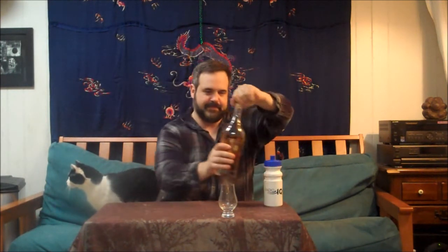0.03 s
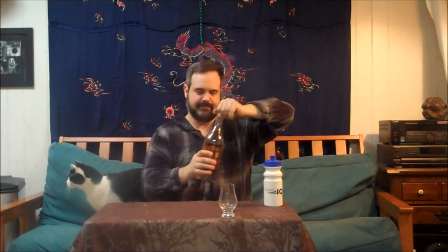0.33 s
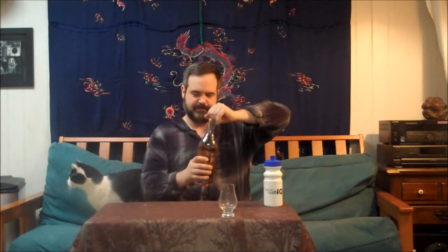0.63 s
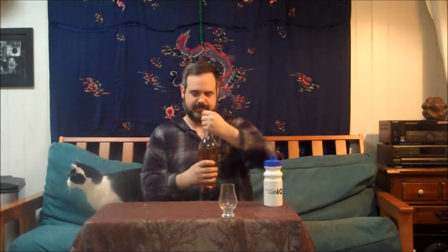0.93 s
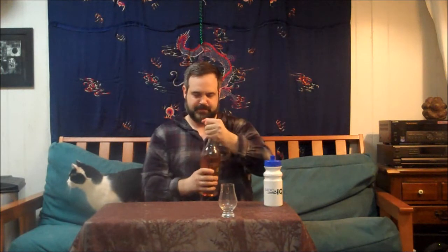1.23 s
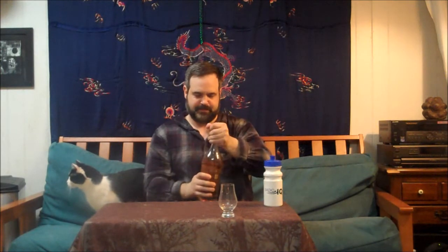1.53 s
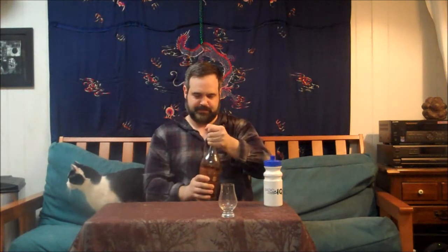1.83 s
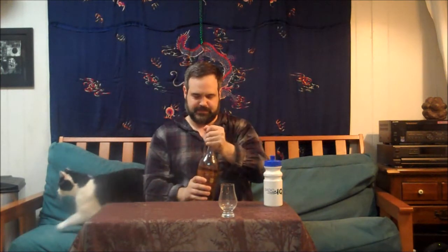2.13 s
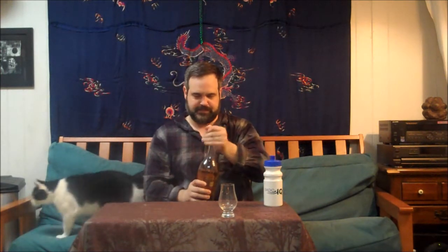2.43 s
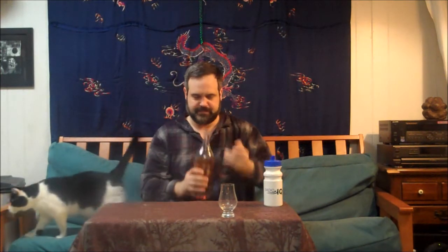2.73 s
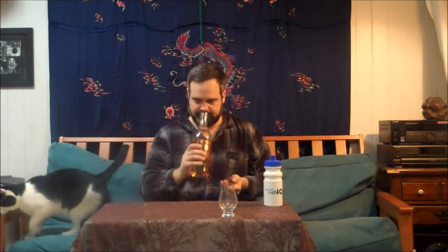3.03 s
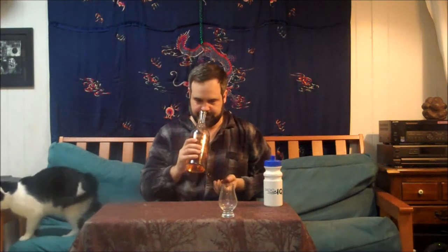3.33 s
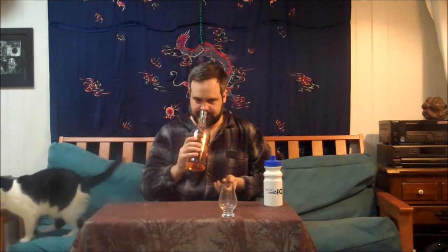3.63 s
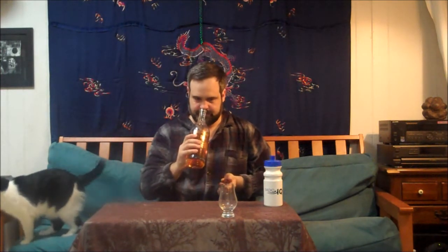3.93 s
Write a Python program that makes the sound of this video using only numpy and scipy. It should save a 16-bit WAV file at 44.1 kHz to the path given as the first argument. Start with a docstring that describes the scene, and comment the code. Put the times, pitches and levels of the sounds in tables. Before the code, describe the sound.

A cork rasps and squeaks as it is twisted out of a glass bottle.

```python
"""Uncorking a bottle

A cork is twisted out of a glass bottle in a quiet living room, a couple of metres away.
It sticks and slips in the neck: one long rasp, a shorter creak, a rising squeak that breaks up,
and a last chirp as it comes free. Every slip makes the cork and neck ring.
Underneath lie room air, the brush of a sleeve and the faint hum of an appliance."""
import sys
import numpy as np
from scipy import signal
from scipy.fft import rfft, irfft
from scipy.io import wavfile
from scipy.ndimage import uniform_filter1d

SR = 44100
rng = np.random.default_rng(int(sys.argv[2]) if len(sys.argv) > 2 else 0)


def wrap_up_sound(samples):
    """Save the sound to the file named by the first command line argument, as 16-bit audio."""
    columns = np.atleast_2d(samples).T
    # keep every value between -1 and 1, then stretch to whole-number steps
    tamed = np.clip(columns, -1, 1)
    steps = np.round(tamed * 32767).astype(np.int16)
    wavfile.write(sys.argv[1], SR, steps)


N = 176400
TIME = np.arange(N) / SR

# How the first twist moves: t/s, level/dB, slip rate/Hz
RASP_SLIPS = [(1.066, -37.5, 216), (1.11, -31.5, 158), (1.144, -41, 144), (1.155, -46.5, 134),
              (1.178, -34.5, 123.4), (1.2, -29, 137), (1.225, -28.5, 160.5), (1.26, -29.5, 154.6),
              (1.32, -26.5, 152), (1.352, -27, 220), (1.374, -36, 139), (1.40, -27, 129),
              (1.43, -31.5, 108), (1.46, -26, 261), (1.50, -32.5, 210), (1.515, -44, 160)]
# How the cork's grip colours the sound: f/Hz, gain/dB
RASP_GRIP = [(400, 2), (800, 3), (1200, -3.5), (2000, -2), (3400, 0), (4300, 0.5), (5600, 1.5),
             (8500, -0.5), (13000, -5)]
def rasp():
    """The first, long twist: the cork catches and lets go over and over."""
    return stick_slip(RASP_SLIPS, RASP_GRIP)


# How the second twist moves: t/s, level/dB, slip rate/Hz
CREAK_SLIPS = [(1.807, -35, 181.6), (1.82, -31, 183.8), (1.845, -24.5, 228.9), (1.865, -23, 258.1),
               (1.893, -25.5, 259.8), (1.912, -32, 221.6), (1.925, -60, 180)]
# The colour of its grip: f/Hz, gain/dB
CREAK_GRIP = [(400, -13), (850, 0.5), (1200, -8), (2050, 1), (2700, -1), (3400, 3), (4600, 1), (6500, 3),
              (8300, -8.5), (13000, -9.5)]
def creak():
    """A shorter twist: the slips speed up, then slow down."""
    return stick_slip(CREAK_SLIPS, CREAK_GRIP)


# Sudden jerks of the cork: t/s, strength/dB
JERK_HITS = [(1.066, -35), (1.1105, -11), (1.134, -4.5), (1.167, -9), (1.3835, -14), (1.393, -15),
             (1.5399, -7.5), (1.5452, -5.5), (1.55, -20), (1.5551, -7.5), (1.8075, -26), (1.866, -21),
             (1.8775, -9), (1.892, -8), (2.043, -12), (2.046, -30)]
def jerks():
    """Single hard slips, each ringing the neck like a click."""
    return ring_neck(slip_force([(t, amp(db)) for t, db in JERK_HITS]), RASP_GRIP)


# The clean, rising tone: t/s, f/Hz, level/dB
SQUEAK_TONE = [(1.992, 1394, -43), (1.999, 1486, -35), (2.006, 1692, -32.5), (2.014, 1758, -29.5),
               (2.022, 1830, -57)]
# The slips it breaks into: t/s, level/dB, slip rate/Hz
SQUEAK_SLIPS = [(2.014, -27.5, 324.8), (2.026, -28.5, 202.2), (2.046, -24.5, 198.8), (2.056, -38.5, 195),
                (2.078, -45, 182.5)]
# The colour of the grip during those slips: f/Hz, gain/dB
SQUEAK_GRIP = [(400, -9), (1100, -21.5), (1750, -7), (2200, -0.5), (3300, 0), (4400, 13), (6000, -3.5),
               (8500, -0.5), (13000, -7.5)]
def squeak():
    """The third twist: the slips lock to a pitch, then break up."""
    return slip_tone(SQUEAK_TONE, RASP_GRIP) + stick_slip(SQUEAK_SLIPS, SQUEAK_GRIP)


# The clean tone in the chirp: t/s, f/Hz, level/dB
RELEASE_TONE = [(2.1575, 1760, -33), (2.169, 1808, -38), (2.175, 1790, -50), (2.178, 2433, -23.5),
                (2.190, 2356, -31.5), (2.198, 2360, -48)]
# The quick slips under it: t/s, level/dB, slip rate/Hz
RELEASE_SLIPS = [(2.1575, -26, 802), (2.168, -21, 717.5), (2.174, -22, 507), (2.186, -41, 445),
                 (2.195, -44, 425)]
# The colour of the grip for both: f/Hz, gain/dB
RELEASE_GRIP = [(400, -16), (1200, -15), (2250, -2.5), (2650, -13), (3400, -2.5), (4200, -1.5), (5300, 10),
                (6800, -15.5), (8600, 3), (13000, -15)]
def chirp():
    """The last twist: the tone jumps up as the cork comes free."""
    return slip_tone(RELEASE_TONE, RELEASE_GRIP) + stick_slip(RELEASE_SLIPS, RELEASE_GRIP)


def stick_slip(curve, grip, gap_scatter=0.14, scatter_db=1, max_slips=300):
    """The cork sticks, then slips, in an uneven run that follows the curve's level and rate."""
    times, db, rate = np.transpose(curve)
    t, slips = times[0], []
    for gap, strength in rng.standard_normal((max_slips, 2)):
        if t > times[-1]:
            break
        stuck_s = np.exp(gap_scatter * gap) / np.interp(t, times, rate)
        level = amp(np.interp(t, times, db) + scatter_db * strength)
        slips.append((t, level * np.sqrt(stuck_s * SR)))  # a longer wait gives a harder slip
        t += stuck_s
    return ring_neck(slip_force(slips), grip)


def slip_force(slips, crumble_s=0.0015, crumble_share=0.48, size=400):
    """Each slip (time, gain) is one sharp kick that crumbles into a burst of tiny slips."""
    force = np.zeros(N + size)
    kick = np.sqrt(1 - crumble_share) * signal.unit_impulse(size)
    bursts = rng.standard_normal((size, size)) * np.exp(-TIME[:size] / crumble_s)
    for (t, gain), burst in zip(slips, bursts):
        crumble = np.sqrt(crumble_share) * burst / np.linalg.norm(burst)
        start = int(t * SR)
        force[start:start + size] += gain * (kick + crumble)
    return force[:N]


def slip_tone(curve, grip, wobble_share=0.0284, db_per_octave=-3.5):
    """Fast, regular slips blend into a slightly wobbly tone with overtones."""
    times, hz, db = np.transpose(curve)
    wobble = rms_one(uniform_filter1d(rng.standard_normal(N), size=60))
    pitch = np.interp(TIME, times, hz) * (1 + wobble_share * wobble)
    phase = 2 * np.pi * np.cumsum(pitch) / SR
    force = sum(amp(db_per_octave * np.log2(k)) * np.sin(k * phase) for k in range(1, 8))
    tone = ring_neck(force, grip)
    # Even out the loudness so that the curve alone sets it.
    even = tone / np.sqrt(np.abs(uniform_filter1d(tone ** 2, size=300)) + 1e-9)
    return even * amp(np.interp(TIME, times, db)) * (TIME > times[0]) * (TIME < times[-1])


# The pitches at which cork and neck ring: f/Hz, width/Hz, relative level/dB
NECK_RINGS = [(613, 600, -24.5), (974, 182, -11.5), (1220, 280, -11.5), (1650, 516, -10.5),
              (2015, 268, -5.5), (3224, 300, -3), (3494, 198, 2), (3793, 710, -9), (4930, 440, -4.5),
              (5450, 335, -1.5), (6100, 750, 0.5), (7550, 1700, -9), (8930, 290, -6), (10800, 15000, -19.5)]
def ring_neck(force, grip, size=4096):
    """A push makes cork and neck ring at many pitches at once, coloured by the grip."""
    kick, response = signal.unit_impulse(size), np.zeros(size)
    for k, (hz, width, db) in enumerate(NECK_RINGS):
        decay = np.exp(-np.pi * width / SR)  # wider rings die sooner
        poles = [1, -2 * decay * np.cos(2 * np.pi * hz / SR), decay ** 2]
        ring = (1 - decay ** 2) / 2 * signal.lfilter([1, 0, -1], poles, kick)
        response += (-1) ** k * amp(db) * ring
    response = colour(response, grip)[:size]
    return convolve(force, response / np.linalg.norm(response))


# Echoes from table and walls: left delay/s, right delay/s, gain/dB
NEAR_ECHOES = [(.0016, 0.0018, -12.5), (.0034, .00336, -5), (.0066, .0067, -8)]
# How alike the room sounds on left and right: f/Hz, likeness (1 = the same)
ROOM_STEREO = [(500, 0.99), (2000, 0.64), (3500, 0.27), (6000, 0.067), (12000, 0.078)]
# How long the room takes to fade by 60 dB: f/Hz, t/s
ROOM_FADE = [(700, 0.21), (3000, 0.19), (5500, 0.21), (11000, 0.17)]
def room(x, tail_db=0.5, build_s=0.0031):
    """Sound arrives directly, then as a few echoes, then as a short wash of many."""
    noise, tail = rfft(stereo_noise(ROOM_STEREO)[:, :SR]), 0
    centres, t = np.geomspace(500, 14000, 8), TIME[:SR]
    for hz, weights in zip(centres, np.eye(len(centres))):
        band = irfft(noise * at_hz(np.transpose([centres, weights]), SR))
        fade_s = np.interp(hz, *np.transpose(ROOM_FADE))
        tail = tail + band * amp(-60 * t / fade_s)
    tail = tail * (1 - np.exp(-t / build_s))
    response = amp(tail_db) * tail / np.linalg.norm(tail, axis=1, keepdims=True)
    response[:, 0] += 1  # the direct sound
    for left_s, right_s, db in NEAR_ECHOES:
        response[[0, 1], [int(left_s * SR), int(right_s * SR)]] += amp(db)
    return convolve(x[None], response / np.linalg.norm(response[0]))


# The colour of the room air: f/Hz, gain/dB
AIR_COLOUR = [(15, -13), (45, -2.5), (85, -5.5), (200, 1.5), (400, -0.5), (520, 0.5), (1000, -2.5),
              (2000, -5.5), (4000, -10), (6000, -9), (8000, -13), (11000, -24.5), (14000, -18)]
# How alike it is on left and right: f/Hz, likeness (1 = the same)
AIR_STEREO = [(30, 0.067), (120, 0.7), (600, 0.6), (2000, 0.18), (5000, 0.05), (12000, .05)]
def room_air(level_db=-59):
    """The air in the room makes a soft, steady rush."""
    return amp(level_db) * coloured_noise(AIR_COLOUR, AIR_STEREO)


# How the brushing swells and fades: t/s, level/dB
SLEEVE_LEVEL = [(0, -58), (.08, -63.5), (.25, -65), (.45, -74), (1.1, -74), (1.6, -65), (1.8, -57.5),
                (2.4, -68), (2.7, -71), (2.87, -67), (3.1, -75), (4, -78)]
# The colour of the cloth: f/Hz, gain/dB
CLOTH_COLOUR = [(1000, -36), (4000, -1), (6000, 13), (8000, 8.5), (12000, -5)]
def sleeve():
    """A brushing sleeve makes a faint, high hiss."""
    level = amp(np.interp(TIME, *np.transpose(SLEEVE_LEVEL)))
    return level * coloured_noise(CLOTH_COLOUR, ROOM_STEREO)


# A motor, its octave, and the mains hum that beats against that octave: f/Hz
HUM_PITCHES = [58.3, 116.55, 120]
# How loud each is: level/dB
HUM_LEVELS = [-70, -71.5, -75.5]
# How far each runs ahead on the left and behind on the right: phase/rad
HUM_SHIFTS = [0.52, 0.24, .2]
# The tones of the motor's whine: f/Hz, level/dB
WHINE_TONES = [(175, -99), (195, -80), (238, -78.5), (350, -77.5), (470, -75), (505, -76), (608, -74.5),
               (865, -84), (972, -78.5), (1187, -78.5)]
def appliance(wander_rad=1.36):
    """A distant motor gives a throbbing hum and a faint, unsteady whine."""
    sides, tones = np.array([[1], [-1]]), 0
    for hz, db, shift in zip(HUM_PITCHES, HUM_LEVELS, HUM_SHIFTS):
        tones += amp(db) * np.cos(2 * np.pi * hz * TIME + shift * sides)
    for hz, db in WHINE_TONES:
        walk = np.cumsum(rng.standard_normal(24))
        wander = np.interp(TIME, np.linspace(0, TIME[-1], len(walk)), walk)
        tones += amp(db) * np.sin(2 * np.pi * hz * TIME + wander_rad * wander)
    return np.sqrt(2) * tones


def amp(db):
    """Turn decibels into a gain."""
    return 10 ** (np.asarray(db) / 20)


def rms_one(x):
    """Scale a sound to an average power of one."""
    return x / np.sqrt(np.mean(x ** 2) + 1e-20)


def at_hz(points, size):
    """Read a table at every frequency of a spectrum, on a log scale."""
    hz, value = np.transpose(points)
    return np.interp(np.log(np.fft.rfftfreq(size, 1 / SR) + 1), np.log(hz), value)


def convolve(x, response):
    """Let every sample of a sound set off the response."""
    return signal.fftconvolve(x, response, axes=-1)[..., :N]


def colour(x, points, size=8192):
    """Turn frequencies up or down as the table says."""
    cepstrum = irfft(np.log(amp(at_hz(points, size))))
    # Fold the filter so that nothing rings before the sound starts.
    cepstrum[1:size // 2] *= 2
    cepstrum[size // 2 + 1:] = 0
    return convolve(x, irfft(np.exp(rfft(cepstrum))))


def stereo_noise(likeness):
    """White noise whose left and right are as alike as the table says."""
    mid, side = rfft(rng.standard_normal((2, N)))
    alike = np.clip(at_hz(likeness, N), -1, 1)
    spectrum = np.sqrt(1 + alike) * mid + np.sqrt(1 - alike) * side * np.array([[1], [-1]])
    return rms_one(irfft(spectrum, N))


def coloured_noise(points, likeness):
    """Stereo noise with the given colour and a power of one."""
    return rms_one(np.array([colour(side, points) for side in stereo_noise(likeness)]))


def scene():
    """The cork's four twists and its jerks sound in the room, over the quiet background."""
    cork = rasp() + creak() + jerks() + squeak() + chirp()
    return room(cork) + room_air() + sleeve() + appliance()


# The colour of the left microphone opening: f/Hz, gain/dB
LEFT_MIC = [(1000, 2.5), (3500, 1.5), (5000, -0.5), (5900, -1.5), (6800, -0.5), (7700, 6.5), (8700, 0.5),
            (10000, 0), (14000, -4.5)]
# The colour of the right one: f/Hz, gain/dB
RIGHT_MIC = [(1000, 1.5), (3500, 1.5), (5000, 1), (5900, 4.5), (6500, 1.5), (7200, -2), (8200, -11),
             (10000, -12), (14000, -20)]
def record(dry, hiss_db=-63, cutoff_hz=14250):
    """Each opening colours its side, the amplifier hisses, and the highest treble is cut."""
    heard = np.array([colour(dry[0], LEFT_MIC), colour(dry[1], RIGHT_MIC)])
    hiss = amp(hiss_db) * rng.standard_normal((2, N))
    treble_cut = signal.ellip(12, .1, 80, cutoff_hz, fs=SR, output="sos")
    return signal.sosfilt(treble_cut, heard + hiss)


dry = scene()
out = record(dry)
wrap_up_sound(out)
```